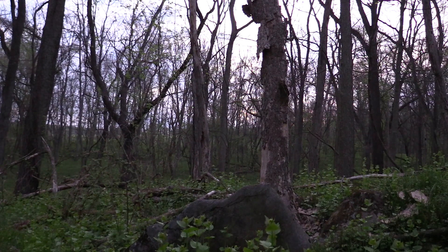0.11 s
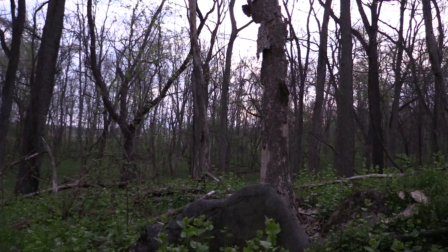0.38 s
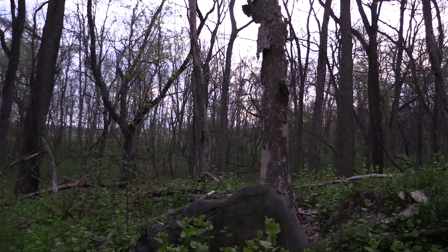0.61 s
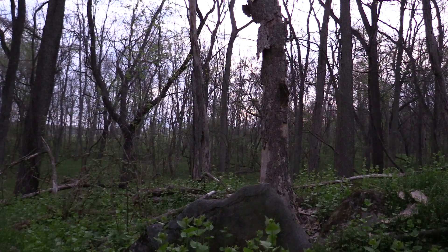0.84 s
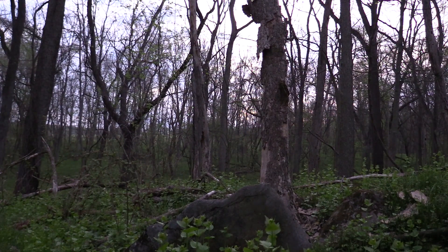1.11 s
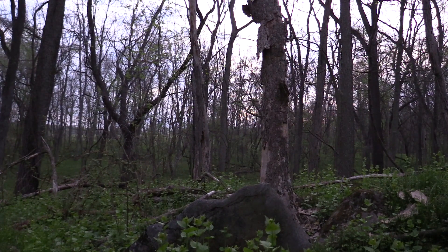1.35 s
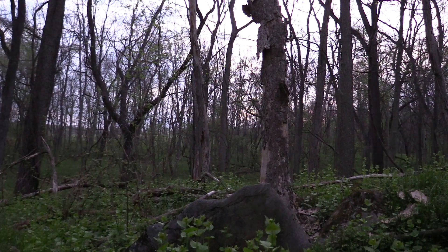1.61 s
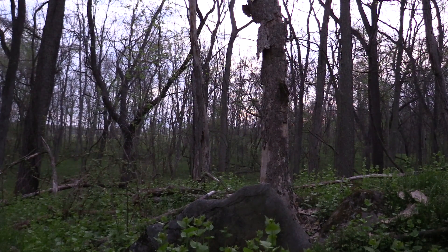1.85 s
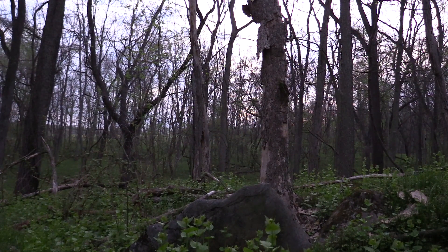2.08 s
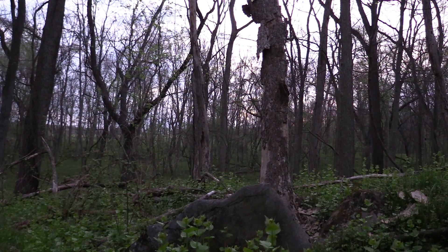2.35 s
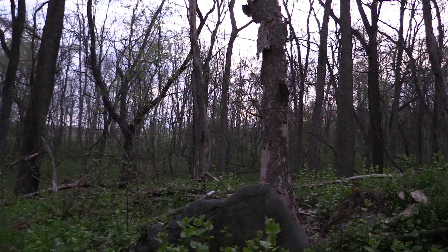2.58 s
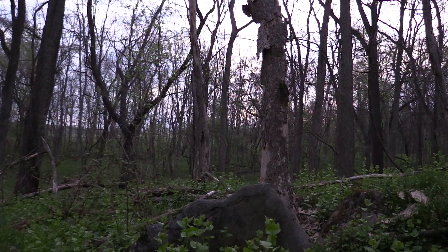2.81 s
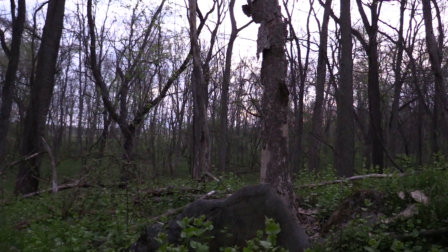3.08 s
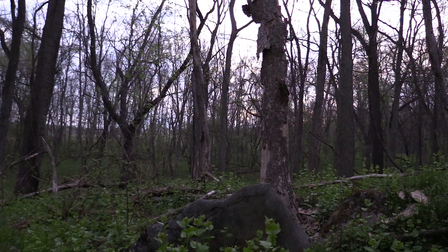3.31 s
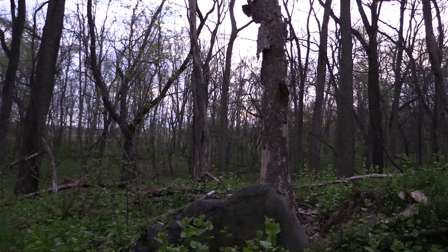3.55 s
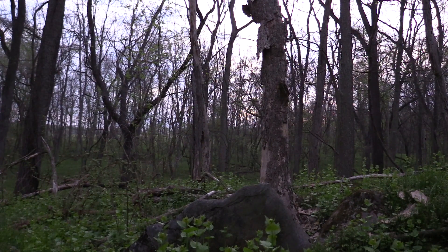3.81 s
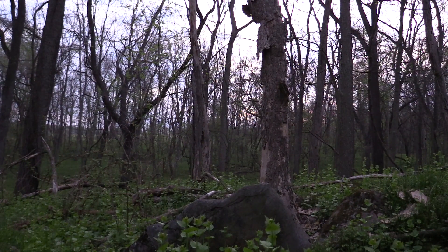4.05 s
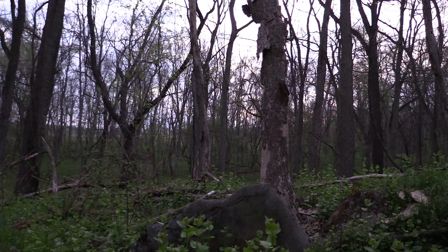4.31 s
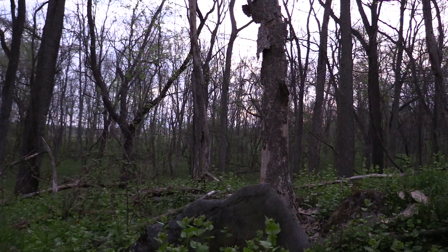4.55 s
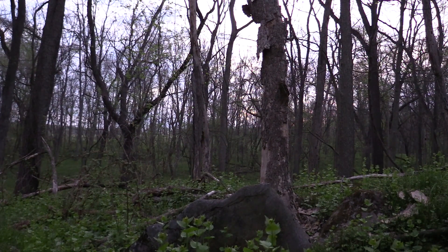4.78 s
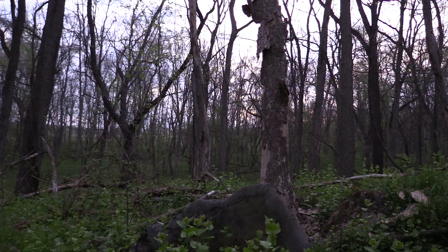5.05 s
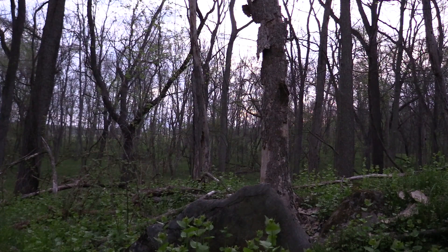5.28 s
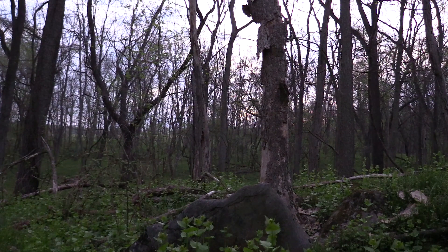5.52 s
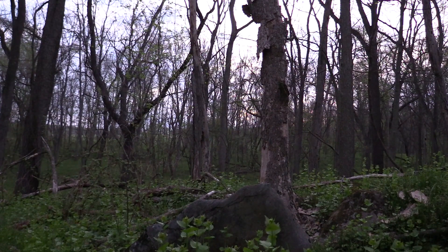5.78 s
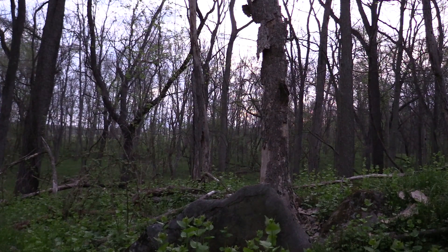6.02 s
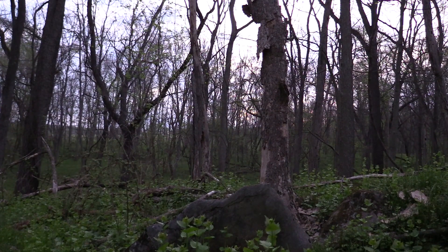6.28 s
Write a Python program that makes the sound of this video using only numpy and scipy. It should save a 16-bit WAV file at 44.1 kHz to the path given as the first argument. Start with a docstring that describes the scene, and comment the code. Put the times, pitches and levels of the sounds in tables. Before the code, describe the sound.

Songbirds whistle and chirp through bare woodland while a nearby turkey yelps in a strengthening run that overloads the microphone, then stops.

```python
"""A rising run of turkey yelps, close by in a leafless wood at dawn, overloads the recorder.
Songbirds whistle, trill and chirp near and far over a low distant rumble and microphone hiss.
The turkey is a sum of harmonics weighted by a throat resonance curve; birds are gliding near-sines.
Rumble, hiss, hum, rattle and hoarse calls are shaped noise; decaying noise supplies the trunk echoes."""
import sys
import numpy as np
from scipy import signal
from scipy.fft import rfft, irfft, next_fast_len
from scipy.io import wavfile
from scipy.ndimage import uniform_filter1d

SR = 44100
rng = np.random.default_rng(int(sys.argv[2]) if len(sys.argv) > 2 else 0)


def log_audio(samples):
    """Write samples as a 16-bit WAV file to the path given in sys.argv[1]."""
    # one column per channel
    frames = np.atleast_2d(samples).T
    # limit to full scale, then quantise
    limited = np.clip(frames, -1, 1)
    pcm = np.round(limited * 32767).astype(np.int16)
    wavfile.write(sys.argv[1], SR, pcm)


def ratio_of_db(decibels):
    """Turn decibels (scalar or array-like) into linear amplitude factors; 0 dB maps to 1."""
    return 10 ** (np.asarray(decibels, float) / 20)


N = 281799   # length in samples


def rms_one(x):
    """Normalization: scales a signal to unit root-mean-square value."""
    return x / np.sqrt(np.mean(x ** 2) + 1e-20)


def at_hz(points, hz):
    """Logarithmic frequency scale: reads a (Hz, value) table between its points."""
    table_hz, values = np.transpose(points)
    return np.interp(np.log(hz), np.log(table_hz), values)


def level_curve(points):
    """Amplitude envelope: turns a (s, dB) table into a gain for each sample."""
    return ratio_of_db(np.interp(np.arange(N) / SR, *np.transpose(points)))


def coloured(x, spectrum):
    """Linear filtering: weights each frequency by the gain of a (Hz, dB) table."""
    hz = np.maximum(np.arange(len(x) // 2 + 1) * SR / len(x), 1)
    return irfft(rfft(x) * ratio_of_db(at_hz(spectrum, hz)), len(x))


def noise(spectrum):
    """Random noise: white noise is coloured and brought to unit rms."""
    white = rng.standard_normal(next_fast_len(N))
    return rms_one(coloured(white, spectrum)[:N])


def drift(rate):
    """Random modulation: two equal poles low-pass white noise at a rate in Hz, to unit rms."""
    pole = np.exp(-2 * np.pi * rate / SR)
    white = rng.standard_normal(N + SR)
    return rms_one(signal.lfilter([1], [1, -2 * pole, pole * pole], white)[SR:])


# Distant rumble. Each row: frequency in Hz, relative spectral density in dB.
RUMBLE_SPECTRUM = [(11, -57), (18, -22.5), (32, -2), (54, 0.5), (129, -6), (157, -8), (265, -16),
                   (329, -18), (399, -19.5), (432, -15), (467, -19.5), (745, -18.5), (1040, -21.5),
                   (1470, -29), (1900, -27.5), (2470, -19.5), (4180, -120)]
# Slow swell of the rumble. Each row: time in seconds, level in dB.
RUMBLE_LEVEL = [(0, -24.8), (3.1, -24.5), (6.39, -23)]


def rumble():
    """Broadband noise: a random signal weighted to the low frequencies swells slowly."""
    return level_curve(RUMBLE_LEVEL) * noise(RUMBLE_SPECTRUM)


# Hiss common to both channels. Each row: frequency in Hz, relative spectral density in dB.
HISS_SPECTRUM = [(880, -30), (1500, -3), (2220, -18), (2860, -7), (3090, 8.5), (3750, -5.5), (3980, -16),
                 (4300, -11), (15500, -22)]


def hiss():
    """Stationary noise: the microphone's random signal keeps one spectrum and level."""
    return ratio_of_db(-33.5) * noise(HISS_SPECTRUM)


# Hiss of opposite sign left and right. Each row: frequency in Hz, relative spectral density in dB.
SIDE_HISS_SPECTRUM = [(12, -16), (20, -5), (119, -12), (648, -12.5), (957, -18.5), (1450, -18), (1810, -17),
                      (2030, -36), (2200, -9.5), (2460, -44), (3540, -52), (3850, -38.5), (4420, -15.5),
                      (12400, -16), (15500, -24.5)]


def side_hiss():
    """Decorrelation: noise added to one channel and taken from the other widens the image."""
    return ratio_of_db(-49.5) * noise(SIDE_HISS_SPECTRUM)


# Faint wavering tones. Each row: frequency in Hz, bandwidth in Hz, level in dB.
HUM_TONES = [(438, 12, -43), (330.5, 9, -48)]


def hum():
    """Resonance: noise through narrow two-pole filters becomes unsteady tones."""
    out = 0
    for hz, width, level_db in HUM_TONES:
        r = np.exp(-np.pi * width / SR)
        poles = [1, -2 * r * np.cos(2 * np.pi * hz / SR), r * r]
        tone = signal.lfilter([1, 0, -1], poles, rng.standard_normal(N))
        out = out + ratio_of_db(level_db) * rms_one(tone)
    return out


# Decay of the scattered sound. Each row: frequency in Hz, 60 dB decay time in seconds
# (before the early boost).
WOOD_DECAY = [(600, 1.6), (1000, 2), (1500, 1.6), (2000, 0.87), (2800, 1.65), (3800, 2.3), (4600, 1.2),
              (7000, 2.1)]
# Colour of the scattered sound and early echoes. Each row: frequency in Hz, relative gain in dB.
WOOD_GAIN = [(600, -28), (1000, 5.5), (1500, -1), (2000, 14.5), (2300, 0.5), (2800, -2.5), (3300, -2.5),
             (4000, 20.5), (5000, 7), (7000, 1.5)]
# The closest trunks answer first and loudest: initial boost in dB, its decay constant in seconds.
NEAR_SCATTER_DB, NEAR_SCATTER_S = 6, 0.1


def wood_response():
    """Multiple scattering: echoes off many trunks form noise, each band decaying at its own rate."""
    t, out = np.arange(2 * SR) / SR, 0
    edges = 500 * 2 ** np.arange(0, 4.3, .5)   # half-octave band edges in Hz
    for low, high in zip(edges, edges[1:]):
        band_filter = signal.butter(2, [low, high], "band", fs=SR, output="sos")
        band = signal.sosfilt(band_filter, rng.standard_normal(len(t)))
        hz = np.sqrt(low * high)
        out = out + band * ratio_of_db(at_hz(WOOD_GAIN, hz) - 60 * t / at_hz(WOOD_DECAY, hz))
    build_up = np.minimum(1, t / 0.018)
    out = out * build_up * ratio_of_db(NEAR_SCATTER_DB * np.exp(-t / NEAR_SCATTER_S))
    return out / np.sqrt(np.sum(out ** 2))   # unit energy


# Ground and nearest trunks. Each row: delay in seconds, gain in dB before colouring.
EARLY_ECHOES = [(.014, -18), (.03, -20.5), (.066, -29.5)]


def early_echoes(source):
    """Discrete reflection: ground and nearest trunks return delayed, weaker, coloured copies."""
    copies = sum(ratio_of_db(gain_db) * np.roll(source, round(s * SR)) for s, gain_db in EARLY_ECHOES)
    return coloured(copies, WOOD_GAIN)


WAVER, WAVER_PER_S = .003, 25   # rms share by which a bird's pitch wanders, and its rate in Hz


def notes(rows, rise, fall, flutter_db):
    """Frequency modulation: near-sines glide along parabolas, their level fluttering with the air.

    Each row: start in seconds, length in seconds, start, middle and end pitch in Hz, level in dB.
    """
    out, waver = np.zeros(N + 2 * SR), np.pad(drift(WAVER_PER_S), SR)   # a second to spare at each end
    for s, length, start_hz, mid_hz, end_hz, level_db in rows:
        u = np.linspace(0, 1, max(round(length * SR), 50))
        at = round(s * SR) + SR
        parabola = np.polyfit([0, .5, 1], [start_hz, mid_hz, end_hz], 2)
        pitch = np.polyval(parabola, u) * (1 + WAVER * waver[at:at + len(u)])
        shape = np.sin(np.pi / 2 * np.clip(np.minimum(u / rise, (1 - u) / fall), 0, 1))
        tone = np.sqrt(2) * np.sin(2 * np.pi * np.cumsum(pitch) / SR)
        out[at:at + len(u)] += ratio_of_db(level_db) * shape * tone
    return out[SR:SR + N] * ratio_of_db(flutter_db * drift(23.3))


def repeated(events, shape, lead_s=0):
    """Stereotyped song: the same note sounds at each event, begun lead_s seconds early."""
    return [(s - lead_s, *shape, level_db) for s, level_db in events]


# Level of the far chorus. Each row: time in seconds, level in dB.
CHORUS_LEVEL = [(0, -21.5), (.3, -27.5), (.59, -25), (.75, -34.5), (1.08, -27), (1.44, -29.5), (1.67, -27),
                (1.9, -30), (2.3, -25), (2.8, -24), (3.0, -23), (3.2, -20.5), (3.55, -24), (3.8, -31),
                (4.3, -32.5), (4.7, -31), (5.85, -26), (6.39, -27.5)]
# Colour given to the chorus. Each row: frequency in Hz, relative gain in dB.
CHORUS_GAIN = [(1000, -37), (1700, -36), (1910, 11), (2120, 0), (2330, 0.5), (2730, 6), (3010, -0.5),
               (3490, -8.5), (3780, -6.5), (4010, -17.5), (4600, -30), (5980, -63), (10100, -120)]


def chorus(wood, count, direct_db, blur_db):
    """Reverberant field: random far slurs are heard mostly as echoes, on a blur of farther birds."""
    draw = rng.random((count, 5))
    start, length = draw[:, 0] * N / SR, .025 + .08 * draw[:, 3]
    hz = 2100 + 1800 * draw[:, 1]
    glide = 1 + .3 * (draw[:, 2] - .5)
    rows = np.transpose([start, length, hz / glide, hz, hz * glide, 6 * draw[:, 4]])
    song = notes(rows, rise=0.28, fall=0.12, flutter_db=1.0)
    song = rms_one(signal.fftconvolve(song, wood)[:N] + ratio_of_db(direct_db) * song)
    blur = noise([(1700, -39), (1800, -15.0), (4400, 8.0), (4700, -51)])
    mixed = rms_one(coloured(song + ratio_of_db(blur_db) * blur, CHORUS_GAIN))
    return level_curve(CHORUS_LEVEL) * mixed


# Level whistles deep in the wood. Each row: start in seconds, length in seconds, pitch in Hz,
# relative level in dB.
HELD_WHISTLES = [(.1, 0.36, 3650, -35.5), (.13, 0.29, 4850, -57), (.42, .48, 6230, -53),
                 (1.099, 0.21, 4070, -48), (.61, 0.11, 3560, -38), (1.323, 0.034, 3930, -22.5),
                 (1.394, .2, 4010, -40), (2.0, 0.19, 3840, -36), (2.2, 0.13, 3890, -30.5),
                 (2.3, 0.27, 3760, -40), (2.496, 0.075, 3870, -29), (2.662, 0.066, 3854, -24),
                 (2.85, 0.11, 6400, -43), (2.91, 0.14, 3787, -23), (3.138, 0.059, 3756, -23),
                 (3.255, 0.047, 3765, -22.5), (3.368, 0.024, 3697, -17), (2.9, 0.55, 4960, -48.5),
                 (3.6, 0.59, 4870, -54.5), (5.123, 0.1, 3770, -45), (5.4, .18, 8280, -49),
                 (5.79, 0.21, 4980, -51), (5.27, 0.53, 6280, -50.5), (5.348, 0.18, 2415, -30.5),
                 (5.404, 0.1, 1942, -29.5), (5.66, 0.22, 6335, -47), (6.244, .14, 6230, -52)]


def far_whistles():
    """Pure tone: each note holds one mean pitch while it wavers slightly."""
    rows = [(s, length, hz, hz, hz, db) for s, length, hz, db in HELD_WHISTLES]
    return notes(rows, rise=.25, fall=.35, flutter_db=3.5)


def rattle():
    """Impulsive excitation: even ticks gate short decaying puffs of band-passed noise."""
    ticks_per_s, centre_hz = 38, 5200
    clicks = np.zeros(N)
    clicks[(np.arange(1.87, 2.35, 1 / ticks_per_s) * SR).astype(int)] = 1
    puffs = signal.lfilter([1], [1, -np.exp(-250 / SR)], clicks) * rng.standard_normal(N)
    band = signal.butter(2, [centre_hz / 1.25, centre_hz * 1.25], "band", fs=SR, output="sos")
    return ratio_of_db(-43) * 10 * signal.sosfilt(band, puffs)


# A far bird's hoarse call. Each row: start in seconds, length in seconds, relative level in dB.
HOARSE_CALLS = [(0.957, 0.37, -18), (1.505, 0.31, -14), (5.859, 0.29, -16)]
# Its two noise bands. Each row: start centre in Hz, end centre in Hz, width in Hz, relative level in dB.
HOARSE_BANDS = [(3334, 3250, 110, -8.5), (2690, 2350, 420, -6.5)]


def buzzes(throb_per_s):
    """Amplitude modulation: two sinking bands of noise throb together."""
    out = np.zeros(N)
    for s, length, level_db in HOARSE_CALLS:
        u = np.linspace(0, 1, round(length * SR))
        throb = 1 + .4 * np.sin(2 * np.pi * throb_per_s * u * length)
        shape = np.sin(np.pi * u ** .6) * throb
        at = round(s * SR)
        for start_hz, end_hz, width, band_db in HOARSE_BANDS:
            low_pass = signal.butter(2, width / 2, fs=SR, output="sos")
            spread = rms_one(signal.sosfilt(low_pass, rng.standard_normal(SR)))
            carrier = np.sin(2 * np.pi * np.cumsum(start_hz + (end_hz - start_hz) * u) / SR)
            out[at:at + len(u)] += ratio_of_db(level_db + band_db) * shape * spread[-len(u):] * carrier
    return out


# Short gliding notes of various birds, loud and faint. Each row: start in seconds, length in seconds,
# start pitch in Hz, end pitch in Hz, level in dB.
GLIDING_NOTES = [(0.065, 0.068, 2276, 2400, -23), (0.423, 0.031, 3494, 2690, -18),
                 (0.519, .035, 3300, 2674, -17), (0.603, 0.028, 2610, 3000, -31),
                 (0.923, .07, 3190, 2770, -15.5), (1.021, .025, 2600, 2460, -19),
                 (1.009, 0.047, 2990, 2830, -13.5), (1.142, 0.048, 2330, 2320, -24),
                 (2.291, 0.039, 2760, 3190, -20), (2.307, .07, 2734, 2628, -20.5),
                 (2.604, 0.023, 2480, 2410, -23), (2.718, .022, 2744, 2845, -13.5),
                 (2.84, 0.0453, 2880, 2770, -14), (2.965, 0.041, 3000, 2660, -16),
                 (3.211, .04, 2960, 2880, -21), (3.405, 0.024, 2290, 2470, -20),
                 (3.669, .035, 2230, 2370, -19.5), (4.438, 0.0388, 3080, 2560, -28.5),
                 (4.493, .08, 2440, 2420, -29.5), (4.7, .05, 3130, 2980, -30),
                 (4.748, 0.02, 3850, 3180, -26), (4.858, 0.072, 3140, 3210, -30),
                 (5.45, 0.032, 2860, 2900, -31), (4.921, 0.1126, 3050, 2896, -27.5),
                 (6.123, 0.0626, 3146, 2800, -23), (6.211, 0.067, 3040, 2830, -24),
                 (6.319, 0.12, 2334, 2430, -25.5)]
# Tiny rising chirps. Each row: start in seconds, level in dB.
CHIRPS = [(2.695, -28), (2.71, -42), (2.832, -32), (2.944, -31), (2.958, -34)]
# One chirp: length in seconds, start, middle and end pitch in Hz.
CHIRP_SHAPE = (.016, 4000, 4300, 4550)


def gliding_birds():
    """Linear glide: straight-pitched notes join brief chirps that sweep upward."""
    rows = [(s, length, a, (a + b) / 2, b, db) for s, length, a, b, db in GLIDING_NOTES]
    return notes(rows + repeated(CHIRPS, CHIRP_SHAPE), rise=.15, fall=.2, flutter_db=2)


# Rising slurs of a two-part song. Each row: start in seconds, level in dB.
UP_EVENTS = [(3.64, -20), (3.915, -20), (4.183, -16), (4.464, -18), (4.733, -23.5), (5.028, -18.5),
             (5.332, -26), (5.6, -25.5)]
# One rising slur: length in seconds, start, middle and end pitch in Hz.
UP_SHAPE = (.05, 3020, 3560, 3700)
# Falling slurs alternating with them. Each row: start in seconds, level in dB.
DOWN_EVENTS = [(3.506, -33), (3.772, -32.5), (4.052, -31), (4.32, -30), (4.598, -32.5), (4.868, -33.5),
               (5.154, -34), (5.45, -35.5)]
# One falling slur: length in seconds, start, middle and end pitch in Hz.
DOWN_SHAPE = (.065, 2050, 1820, 1556)


def two_part_song():
    """Frequency sweep: rising slurs and lower falling slurs alternate."""
    rows = repeated(UP_EVENTS, UP_SHAPE) + repeated(DOWN_EVENTS, DOWN_SHAPE)
    return notes(rows, rise=.7, fall=.2, flutter_db=3.5)


# Level of the trill before its unevenness. Each row: time in seconds, level in dB.
TRILL_LEVEL = [(3.36, -27), (4.0, -26), (4.4, -27), (4.7, -30)]
# One falling chip: length in seconds, start, middle and end pitch in Hz.
CHIP_SHAPE = (.036, 4600, 3980, 3600)


def trill():
    """Pulse train: quick falling chips of uneven strength shorten their period partway."""
    gaps_s = [.0779] * 7 + [.0706] * 11
    s = 3.3647 + np.cumsum([0] + gaps_s)
    uneven_db = 1.2 * rng.standard_normal(len(s))
    chips = zip(s, np.interp(s, *np.transpose(TRILL_LEVEL)) + uneven_db)
    return notes(repeated(chips, CHIP_SHAPE, lead_s=0.003), rise=.8, fall=.2, flutter_db=1.5)


# A near bird's rising slur. Each row: start in seconds, level in dB.
NEAR_EVENTS = [(-.08, -7), (.195, -8), (2.955, -11), (3.226, -8), (3.503, -7.5), (3.778, -8.5)]
# One slur: length in seconds, start, middle and end pitch in Hz.
NEAR_SHAPE = (.135, 2480, 2745, 2810)


def near_whistles():
    """Curved sweep: a near-sine rises fast, then levels off."""
    return notes(repeated(NEAR_EVENTS, NEAR_SHAPE), rise=.15, fall=.06, flutter_db=1.5)


PIP_EDGE_DB, PIP_TILT_DB = -3.5, -9   # level at both ends; brightness in dB per octave


def pip_course(length, start_hz, end_hz):
    """Spectral tilt: steeply weakened upper partials make a short note dull."""
    u = np.linspace(0, 1, round(length * SR))
    pitch = start_hz + (end_hz - start_hz) * u
    return pitch, PIP_EDGE_DB * (2 * u - 1) ** 2, PIP_TILT_DB + 0 * u


ONSET_HZ, TOP_HZ = 995.4, 1077   # a yelp breaks in high and ends high
# It settles on its opening pitch (s), holds it to a share of its length, then drops to the low one (s).
SETTLE_S, OPENING_SHARE, DROP_S = 0.0074, .28, 0.0077
# It bends up ever faster (s, exponent) and holds the top for a moment (s).
RISE_S, RISE_CURVE, LAST_S = .035, 3.33, 0.00552
# Levels relative to the low part, with the attack time in seconds.
ATTACK_S, ATTACK_DB, OPENING_DB, RISE_DB, RELEASE_DB = 0.0064, -16.5, -2.5, -5.5, -16.5
# Brightness in dB per octave, before the share that grows with loudness.
OPENING_TILT_DB, LOW_TILT_DB, RISE_TILT_DB, EDGE_TILT_DB = -0.5, -1, 0.5, -11.5


def yelp_course(length, opening_hz, low_hz):
    """Register break: pitch and brightness step down as level rises slightly, then pitch bends upward."""
    t = np.arange(round(length * SR)) / SR
    opening, top = OPENING_SHARE * length, length - LAST_S
    low = opening + DROP_S
    bend = np.clip(1 - (top - t) / RISE_S, 0, 1) ** RISE_CURVE
    pitch = np.interp(t, [0, SETTLE_S, opening, low], [ONSET_HZ, opening_hz, opening_hz, low_hz])
    pitch = pitch + (TOP_HZ - low_hz) * bend
    stages = [0, ATTACK_S, opening, low, top, length]
    level_db = np.interp(t, stages, [ATTACK_DB, OPENING_DB, OPENING_DB, 0, 0, RELEASE_DB])
    tilts = [EDGE_TILT_DB, OPENING_TILT_DB, OPENING_TILT_DB, LOW_TILT_DB, LOW_TILT_DB, EDGE_TILT_DB]
    tilt_db = np.interp(t, stages, tilts) + (RISE_TILT_DB - LOW_TILT_DB) * np.sqrt(bend)
    return pitch, level_db + RISE_DB * bend, tilt_db


# Turkey yelps. Each row: start in seconds, length in seconds, opening pitch in Hz, low pitch in Hz,
# level of the low part in dB.
YELP_CALLS = [(1.455, 0.042, 766, 770, -8), (1.77, 0.056, 763, 734, -4), (2.084, .078, 813, 778, -3.5),
              (2.422, 0.087, 850.6, 771.5, 1), (2.736, .087, 950, 759, 2.5),
              (3.063, .081, 1020, 764.5, 3.5)]
# Soft short pips: a faint first yelp and openings of yelps. Each row: start in seconds,
# length in seconds, start pitch in Hz, end pitch in Hz, level in dB.
PIP_CALLS = [(1.094, 0.0175, 870, 930, -24.5), (1.116, .022, 787, 745, -27),
             (1.415, 0.0157, 784, 1010, -21), (1.745, 0.0184, 962, 950, -18.5)]
# Turkey throat and beak. Each row: frequency in Hz, relative gain in dB.
THROAT_GAIN = [(700, -2), (1000, -5), (1550, 2.5), (1750, 3.5), (2000, -9), (2300, 0.5), (2550, -7.5),
               (2900, 5), (3150, -8), (3400, 1), (3750, -27.5), (4600, -28), (7000, -28.5), (11000, -41)]
RASP_FROM_HZ, RASP_SHARE = 820, .25   # pushed above this pitch the voice turns raspy
RASP_JITTER = 2.5   # extra pitch wander at full rasp, as a multiple of the plain wander
TILT_PER_DB = 0.18   # louder calls are brighter: dB per octave for each dB of level


def turkey_calls(rough, spread):
    """Source and filter: the throat weights gliding harmonics where they pass; jitter roughens them.

    rough is the rms share of pitch wander without rasp; spread sets the partials' phases.
    """
    out, jitter, rasp = np.zeros(N), drift(240), drift(310)
    order = np.arange(1, 15)[:, None]
    calls = [(row, yelp_course) for row in YELP_CALLS] + [(row, pip_course) for row in PIP_CALLS]
    for (s, *form, peak_db), course in calls:
        hz, level_db, tilt_db = course(*form)
        at = round(s * SR) + np.arange(len(hz))
        raspy = np.clip((hz - RASP_FROM_HZ) / 100, .1, 1)
        wander = rough * (1 + RASP_JITTER * raspy) * jitter[at]
        pitch = uniform_filter1d(hz, size=90) * (1 + wander)
        brightness = (tilt_db + TILT_PER_DB * peak_db) * np.log2(order)
        gains = ratio_of_db(at_hz(THROAT_GAIN, order * pitch) + brightness)
        gains /= np.sqrt(np.sum(gains ** 2, axis=0) / 2)   # unit power before the level is set
        phase = 2 * np.pi * np.cumsum(pitch) / SR
        voice = np.sum(gains * np.sin(order * phase + spread * order ** 2), axis=0)
        voice *= 1 + RASP_SHARE * raspy * rasp[at]
        edges = np.minimum(1, np.minimum(at - at[0], at[-1] - at) / 80)
        out[at] += voice * ratio_of_db(peak_db + level_db) * edges
    return out


def scene():
    """Superposition: direct sounds, their scattered echoes and the background add linearly."""
    wood = wood_response()
    turkey = turkey_calls(rough=.007, spread=1.3)
    near = near_whistles()
    song = trill() + two_part_song()
    others = gliding_birds() + rattle() + buzzes(throb_per_s=45.4)
    far = far_whistles()
    # each source's share sent into the wood
    sent = ratio_of_db(-19.5) * turkey + ratio_of_db(-7) * near + ratio_of_db(-10.0) * song + ratio_of_db(-5.5) * others + ratio_of_db(-6.0) * far
    mid = turkey + early_echoes(turkey) + near + song + others + ratio_of_db(-1.0) * far
    mid += signal.fftconvolve(sent, wood)[:N]
    mid += chorus(wood, count=500, direct_db=-12, blur_db=2) + hum()
    mid += rumble() + hiss()
    side = side_hiss()
    return np.array([mid + side, mid - side])


def band_limit(x):
    """A steep low-pass at the top of the band."""
    return signal.sosfilt(signal.butter(12, 15610, fs=SR, output="sos"), x)


def record(dry):
    """Saturation: the loudest yelps hit the recorder's ceiling and are cut flat."""
    ceiling, hardness = 0.97, 20.0   # full scale is 1; a larger exponent gives a sharper corner
    clipped = dry / (1 + np.abs(dry / ceiling) ** hardness) ** (1 / hardness)
    return band_limit(clipped)


dry = scene()
out = record(dry)
log_audio(out)
```